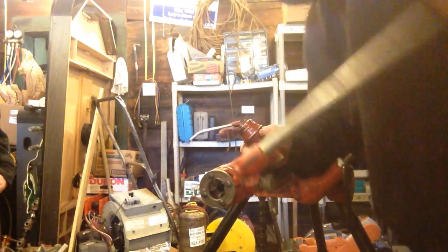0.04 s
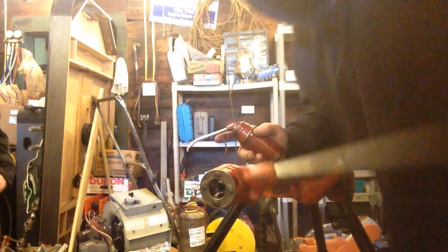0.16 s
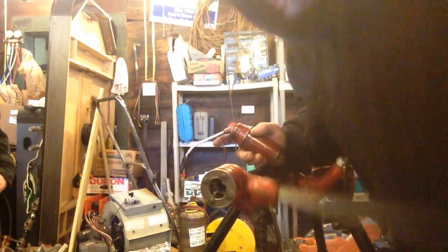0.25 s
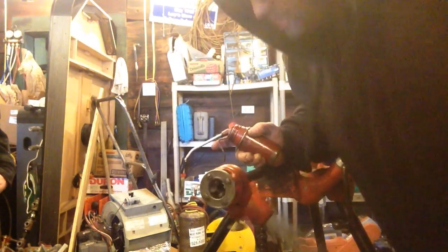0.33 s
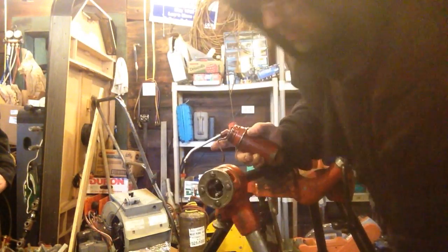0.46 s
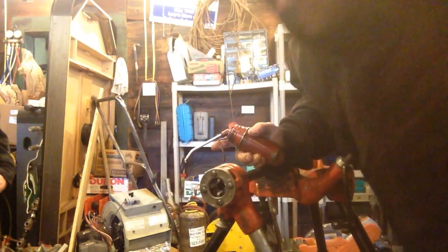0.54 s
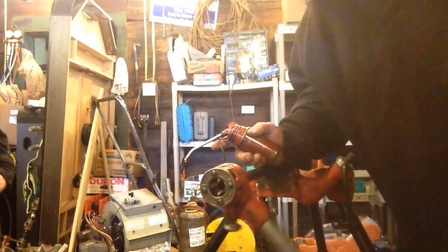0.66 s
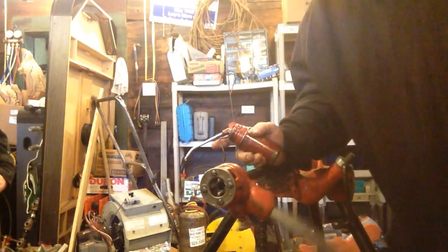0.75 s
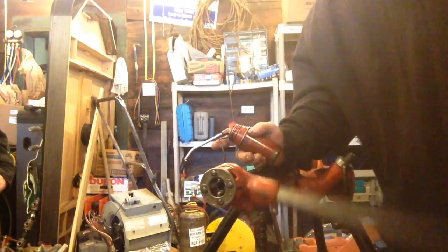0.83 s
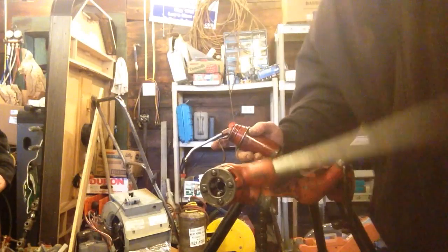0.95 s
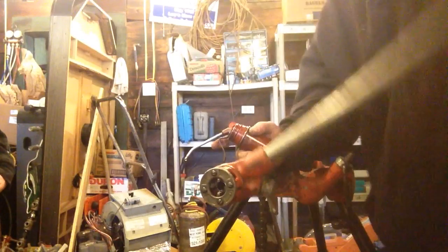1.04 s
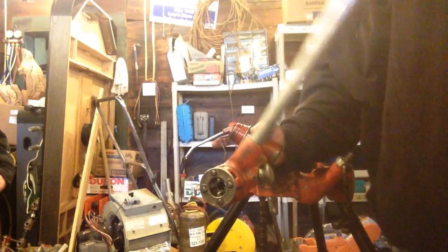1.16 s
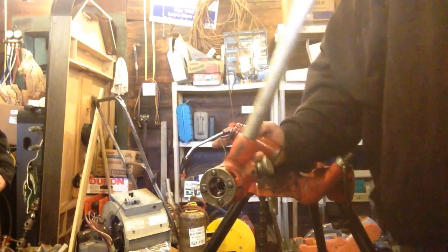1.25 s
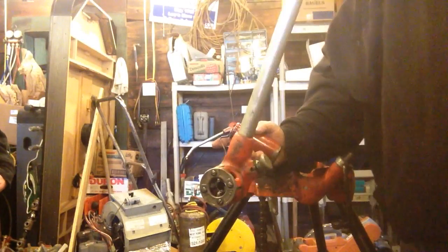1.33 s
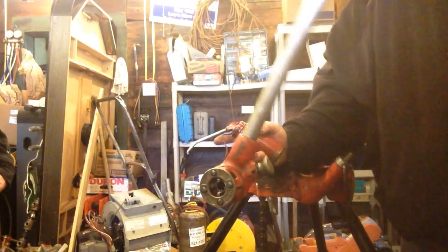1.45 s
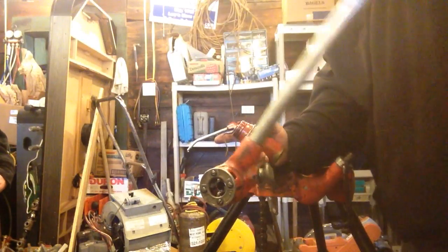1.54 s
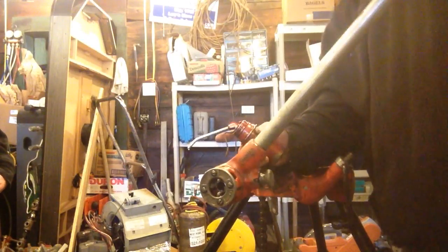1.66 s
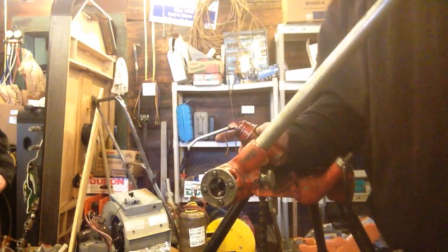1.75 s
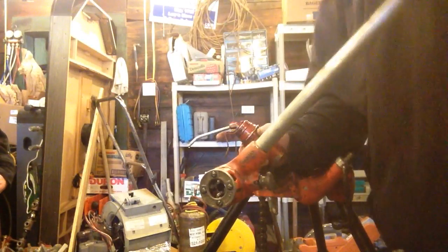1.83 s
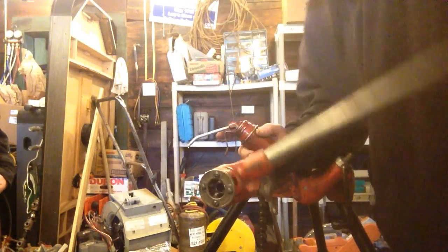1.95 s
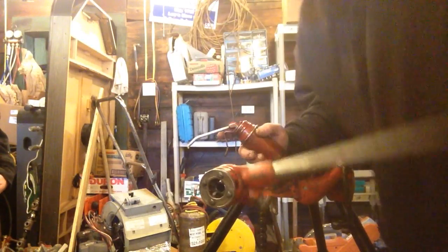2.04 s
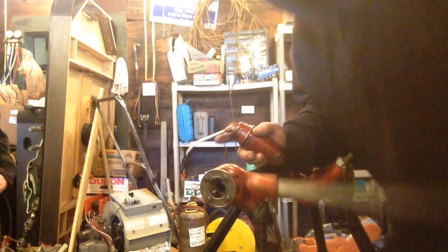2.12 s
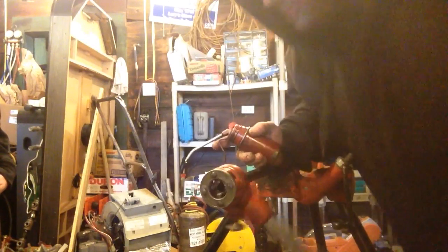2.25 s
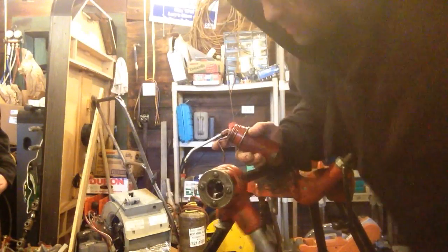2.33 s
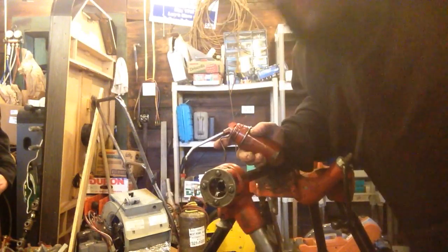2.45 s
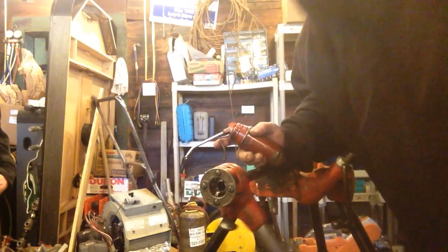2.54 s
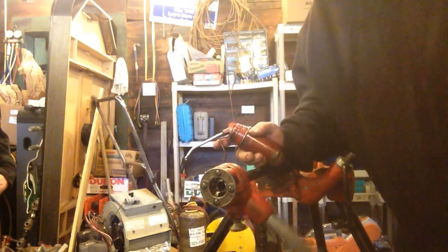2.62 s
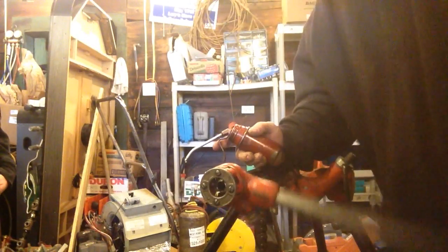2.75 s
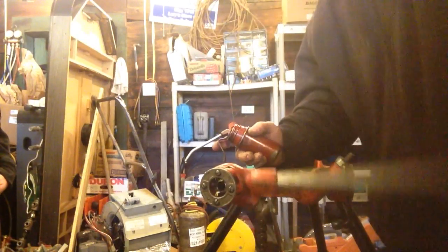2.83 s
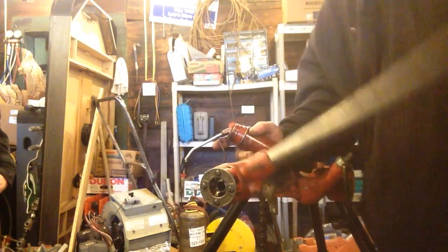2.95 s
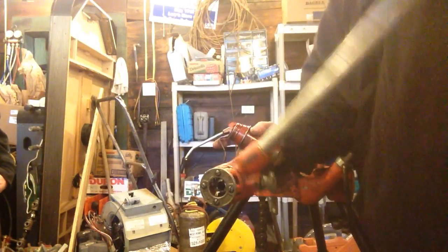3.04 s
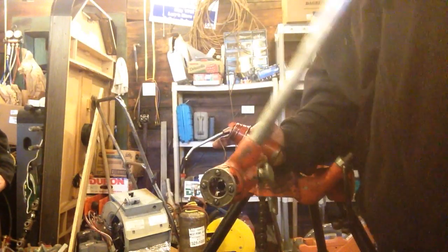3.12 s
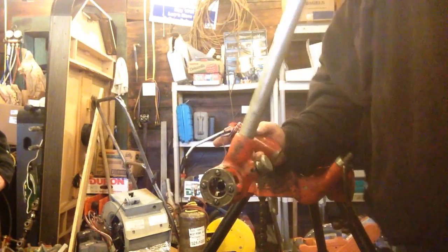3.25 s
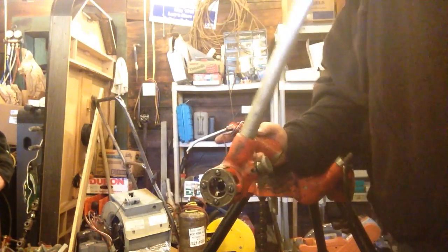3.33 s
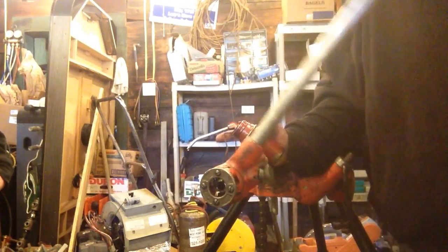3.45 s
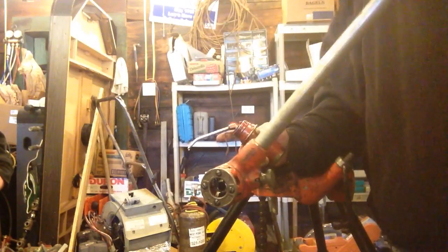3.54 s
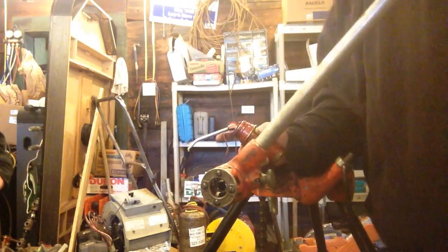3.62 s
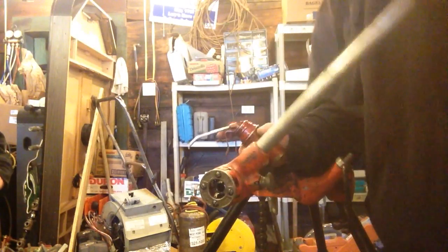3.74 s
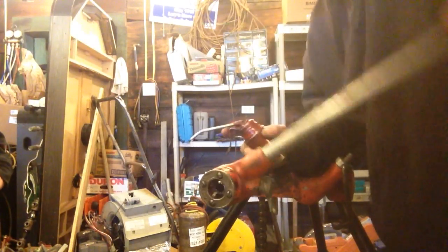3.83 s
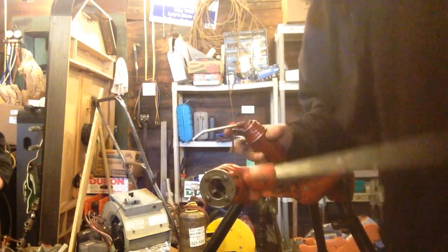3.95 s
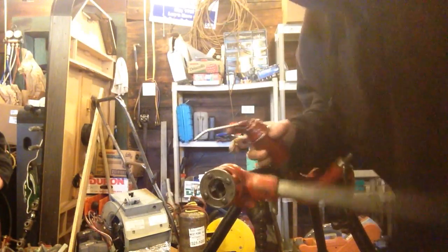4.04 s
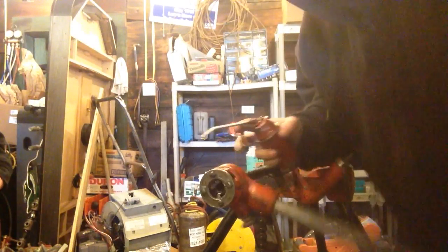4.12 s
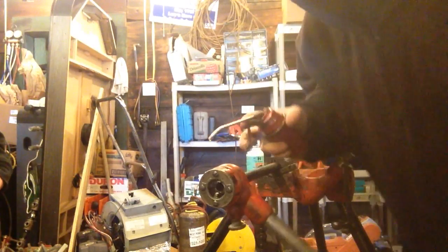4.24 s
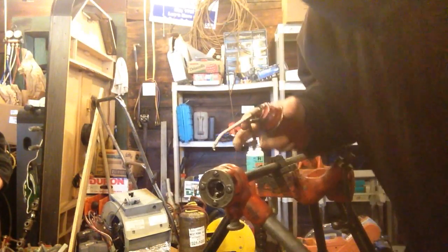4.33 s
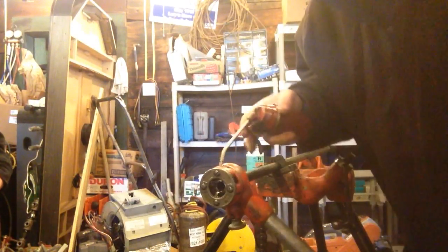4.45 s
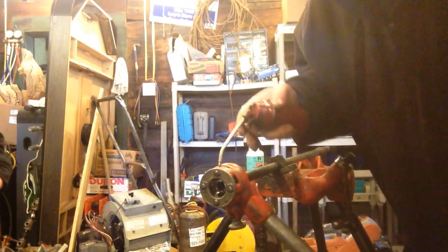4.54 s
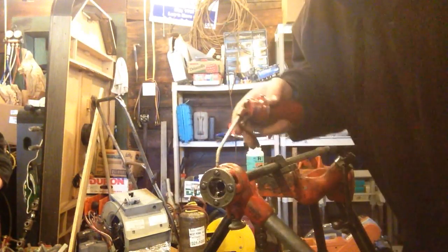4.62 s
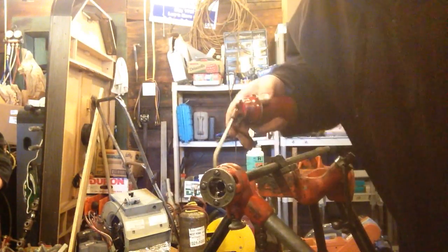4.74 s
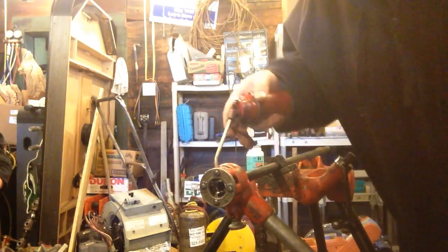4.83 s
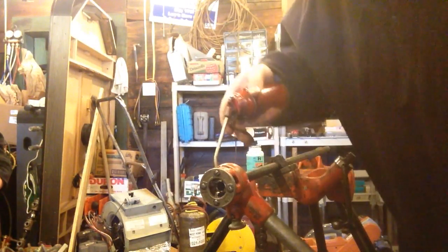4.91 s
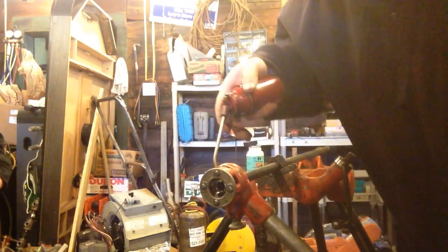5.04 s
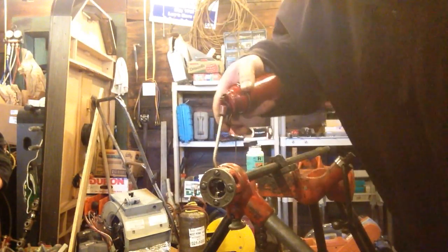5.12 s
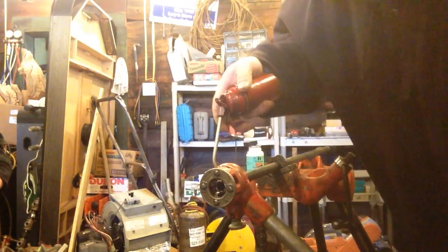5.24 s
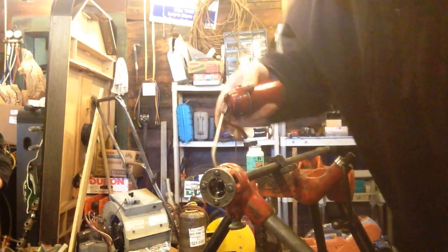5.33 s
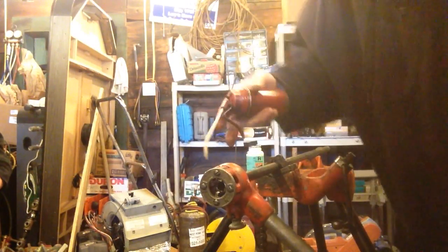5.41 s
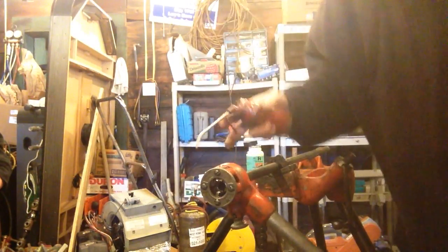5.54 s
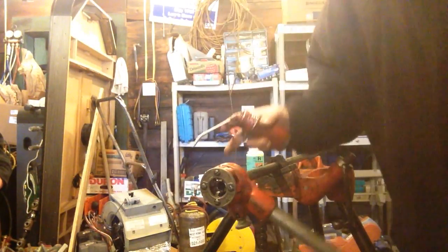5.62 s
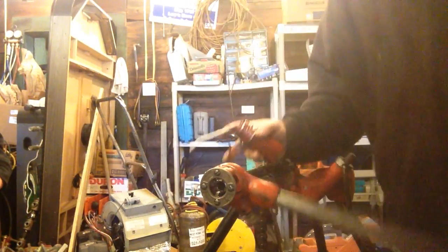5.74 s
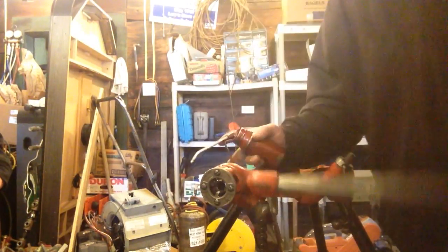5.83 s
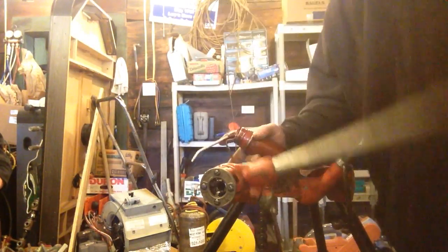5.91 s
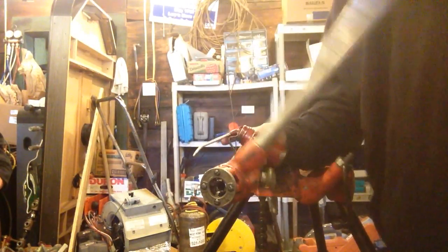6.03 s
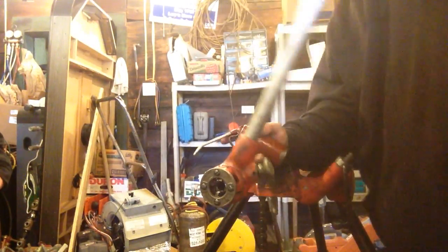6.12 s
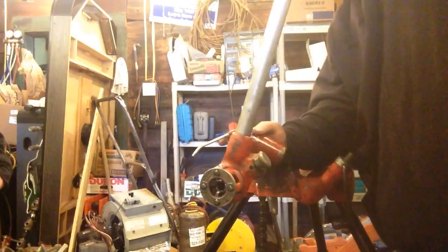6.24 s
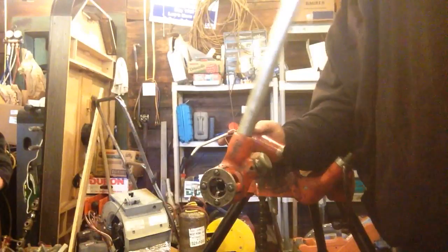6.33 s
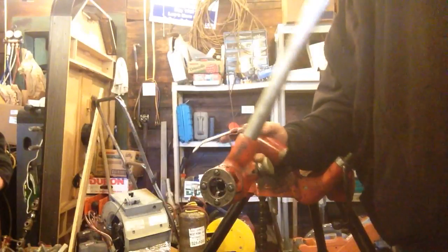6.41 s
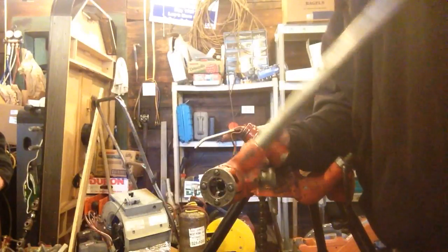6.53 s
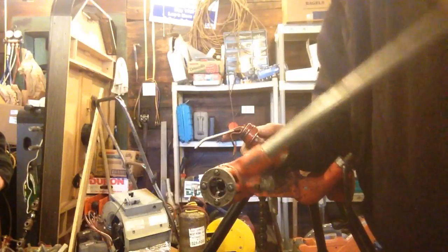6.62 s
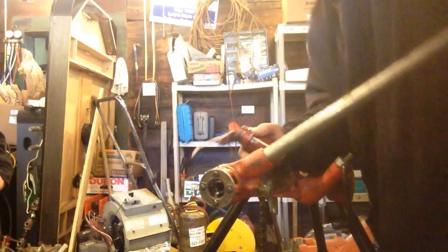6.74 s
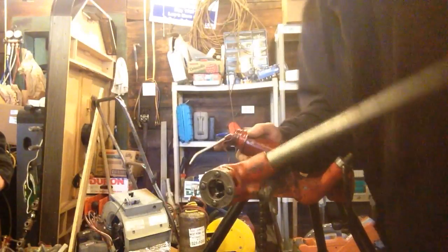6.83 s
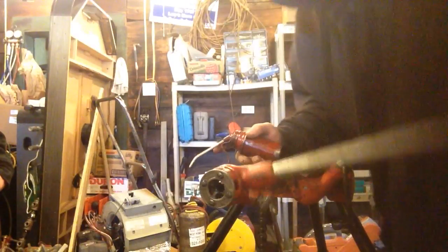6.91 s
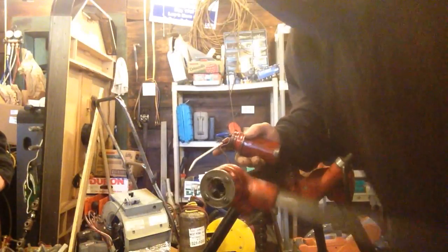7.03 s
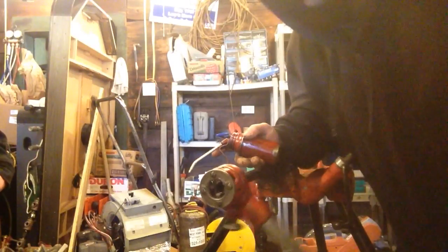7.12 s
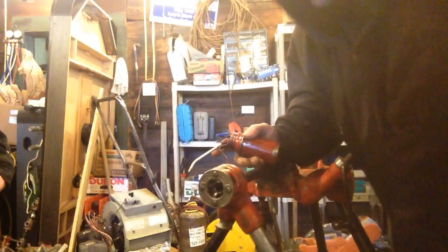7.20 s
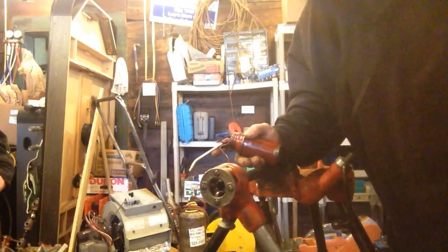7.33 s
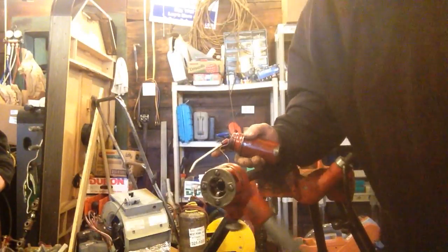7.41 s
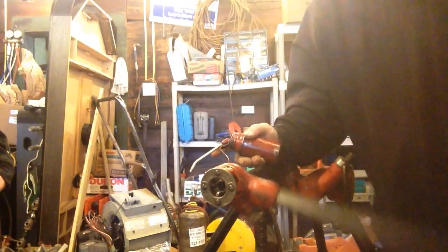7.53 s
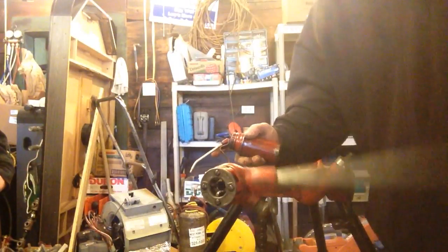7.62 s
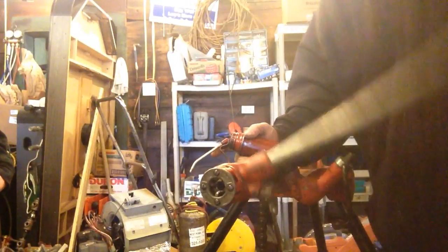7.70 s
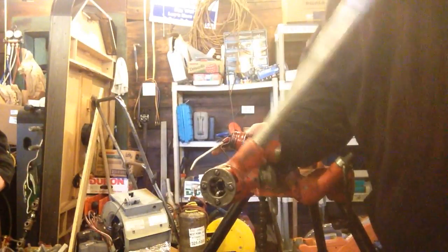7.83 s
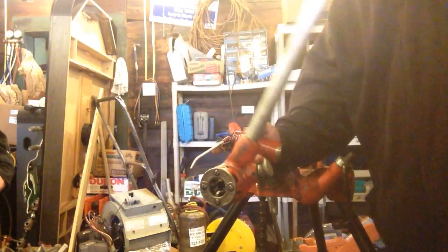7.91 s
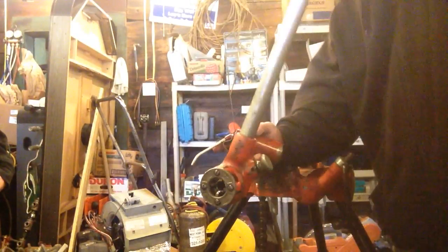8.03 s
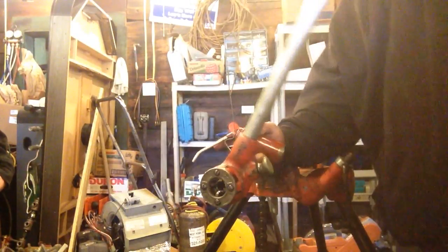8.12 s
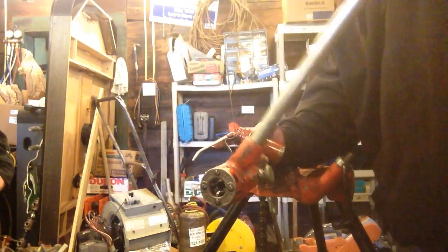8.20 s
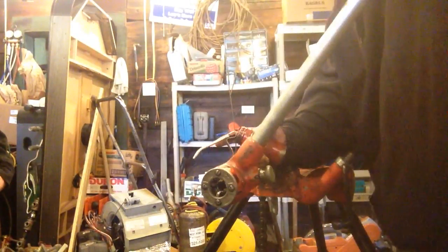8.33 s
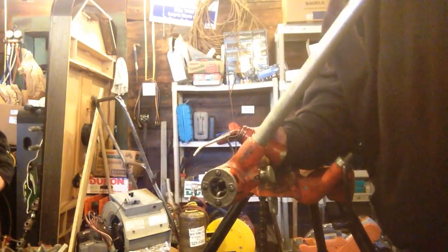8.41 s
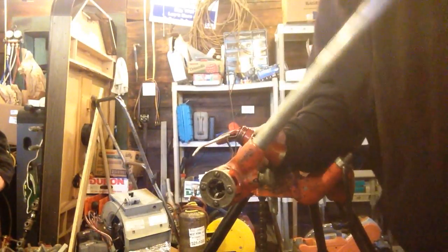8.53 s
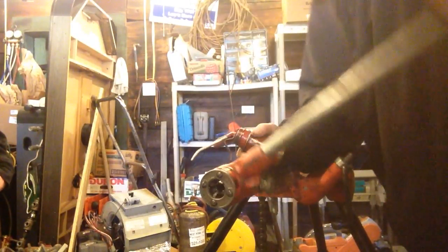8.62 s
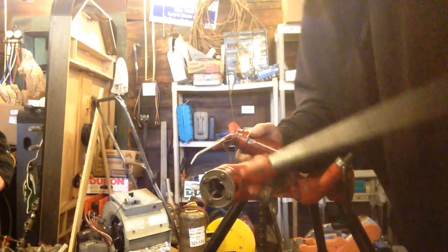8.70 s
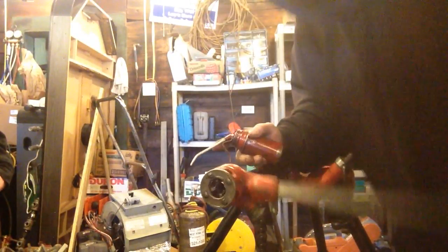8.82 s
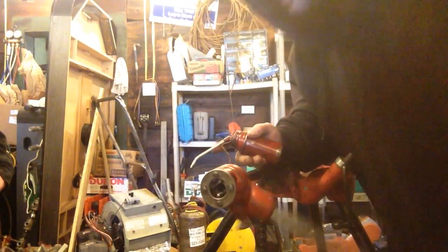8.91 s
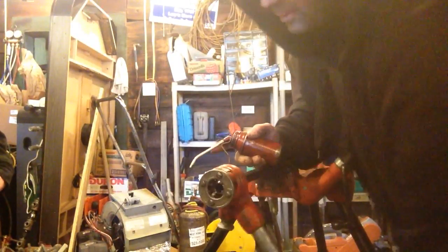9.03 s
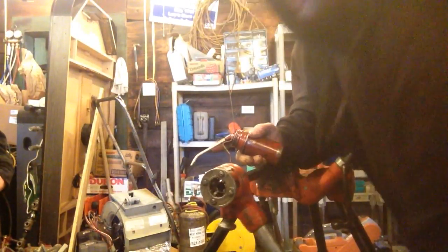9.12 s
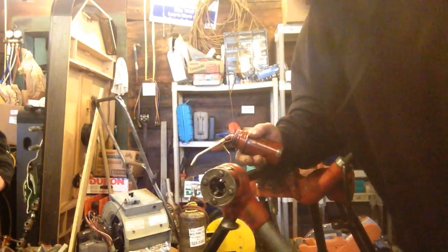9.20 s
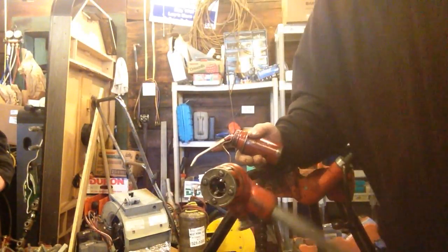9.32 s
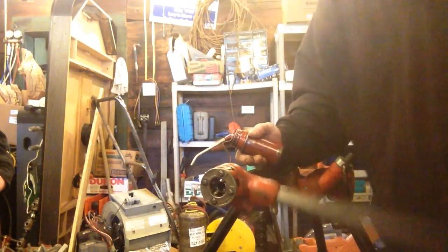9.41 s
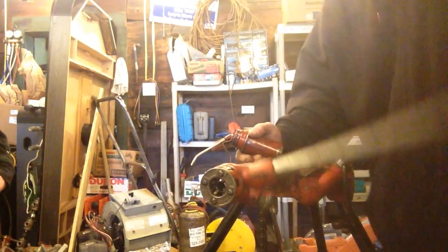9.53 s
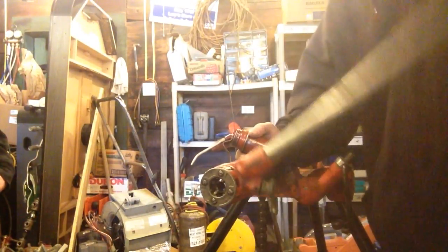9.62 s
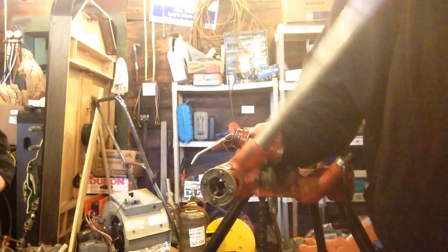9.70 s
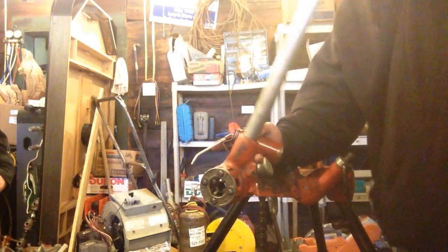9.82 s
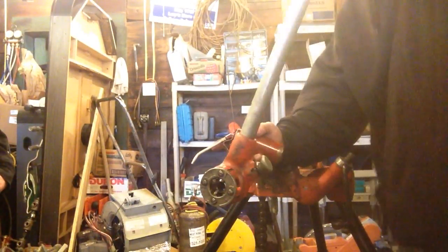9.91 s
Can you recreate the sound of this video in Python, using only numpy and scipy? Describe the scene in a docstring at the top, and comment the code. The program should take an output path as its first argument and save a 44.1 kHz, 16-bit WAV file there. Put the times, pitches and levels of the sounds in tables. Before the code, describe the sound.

In a small workshop, a hand threader cuts an iron pipe. Soft, gritty scrapes with a fine fizz swell on each down stroke, followed by louder, uneven ratchet clacks and loose handle rattles on the return. Midway the work pauses for light, tinny clicks from a pumped oil can, then scraping and ratcheting resume. The sounds are fairly close, with short reflections over faint hum and room noise.

```python
"""A small workshop: a hand threader cuts a thread on iron pipe.
Down strokes: the dies scrape, chips excite the pipe's resonances, a fine fizz rides on top.
Return strokes: the pawl clacks over the ratchet teeth; the loose handle rattles in its play.
Midway an oil can is pumped, its lever ringing the thin can. Faint hum and room noise lie under it."""
import sys
import numpy as np
from scipy import signal
from scipy.fft import rfft, irfft
from scipy.io import wavfile

SR = 44100
rng = np.random.default_rng(int(sys.argv[2]) if len(sys.argv) > 2 else 0)


def file_out(sig):
    """Save sig as 16-bit WAV at sys.argv[1]."""
    # one column per channel
    cols = np.atleast_2d(sig).T
    # limit, then scale
    lim = np.clip(cols, -1, 1)
    pcm = np.round(lim * 32767).astype(np.int16)
    wavfile.write(sys.argv[1], SR, pcm)


N = 439236

# room noise spectrum: f/Hz, relative density/dB
ROOM_SPECTRUM = [(15, -78), (25, -36), (60, -35.5), (131, -8.5), (219, -1), (357, -3), (409, -4.5),
                 (551, -10.5), (923, -11.5), (1120, -13.5), (3050, -14), (5100, -14.5), (6340, -19.5),
                 (14300, -17), (16400, -11.5)]
# hum bands: f/Hz, width/Hz, level/dB
HUM_BANDS = [(403.6, 7.8, -79), (456, 2.7, -79.5), (234, 15.8, -90)]
# down strokes: start t/s, fizz onset t/s, hardest t/s, end t/s, top scrape level/dB, fizz/dB re scrape
DOWN_STROKES = [(0, 0.077, 0.38, 0.52, -54.5, -8), (1.888, 1.93, 2.27, 2.45, -57, -7.5),
                (3.7, 3.838, 4.09, 4.386, -59.5, -5), (6.84, 6.96, 7.166, 7.3, -54, -11.5),
                (8.486, 8.62, 8.97, 9.13, -58.5, -6)]
# pipe resonances under the dies: f/Hz, width/Hz, level/dB
PIPE_MODES = [(913, 55, -1), (1430, 210, -9), (1840, 220, 1.5), (2510, 230, -1.5), (2985, 160, 2.5),
              (3680, 110, -2), (4220, 250, -10), (4990, 350, -10)]
# scrape excitation: f/Hz, relative density/dB
SCRAPE_SPECTRUM = [(300, -23), (700, -7.5), (3000, -4.5), (5500, -7), (8000, -15.5)]
# chip fizz: f/Hz, relative density/dB
FIZZ_SPECTRUM = [(3240, -32), (5500, -17), (7830, -3), (10000, -4), (14700, -2), (15700, -1), (16000, -33)]
# workshop decay: f/Hz, t60/s
SHOP_DECAY = [(250, 0.33), (660, 0.32), (1740, 0.2), (4590, 0.16), (12100, 0.13)]
# die head and handle tube modes: f/Hz, level/dB, t60/s at damping 1
IRON_MODES = [(399.7, -9, 0.18), (966, -7.5, 0.095), (1238, 0.5, 0.034), (1681, -3.5, 0.063),
              (2008, -7, 0.077), (2150, -12.5, 0.024), (2689, -8, 0.12), (3150, -2, 0.04),
              (3220, -2, 0.038), (3395, -3, 0.062), (4927, -5, 0.038), (4985, 3.5, 0.039), (6020, 6, 0.023),
              (9500, -5.5, 0.018), (14300, -14, 0.049)]
# handle and die head knocks: t/s, level/dB, ring f/Hz, tick/dB re blow; # the row at 2.5429 s is the pawl's
# rebound after its 2.4819 s clack
HANDLE_KNOCKS = [(0.0148, -58.5, 1390, -10), (0.0793, -55.5, 3520, 4), (0.6401, -50, 1010, -43),
                 (0.6812, -56, 1720, -25), (0.7694, -47.5, 3380, -16), (0.935, -49, 3250, -9),
                 (1.0016, -45.5, 3370, -11), (1.0398, -34, 3220, -21), (1.195, -60, 4900, -14),
                 (1.2125, -50, 3610, -6), (1.3216, -49.5, 3180, -14), (1.391, -59, 3253, -12),
                 (1.544, -60, 5030, -30), (1.5718, -53, 3020, -20), (1.666, -44, 2680, -26),
                 (1.7088, -47.5, 1240, -12.5), (1.8762, -52, 1280, -14), (1.935, -51.5, 4710, 3),
                 (2.4178, -39, 4500, 3), (2.5429, -45.5, 1720, -14), (2.727, -48.5, 4130, -5),
                 (2.7744, -50, 2735, -18), (2.7865, -30.5, 4650, -14), (2.9174, -54, 3340, -10),
                 (2.9811, -30.5, 5000, -29), (3.13, -58, 900.5, -21), (3.4698, -40.5, 5130, -2),
                 (3.49, -53.5, 2700, -18), (3.548, -52.5, 3700, -28), (3.5663, -44, 1220, -28),
                 (3.6184, -49.5, 1300, -9.5), (3.7702, -55.5, 1471, -19), (4.119, -52, 2500, 15),
                 (4.3332, -57.5, 3730, -11), (4.342, -64, 1310, -15), (5.5858, -43, 3217, -42),
                 (5.6518, -56, 1280, -18), (5.7685, -42, 4944, -12), (5.8035, -36, 3460, -16),
                 (6.0425, -43, 3320, -8), (6.1663, -47, 1927, -20), (6.2011, -40.5, 5030, -8),
                 (6.3039, -53, 4290, -8), (6.3133, -51.5, 3550, -22), (6.4033, -45.5, 1800, -29),
                 (6.4456, -55, 4900, -13), (6.6288, -52, 2744, -15), (6.6446, -49.5, 3340, -29),
                 (6.6946, -52.5, 3220, -22), (6.9694, -48, 1210, -15), (7.3732, -52, 1240, -14),
                 (7.4, -48, 3300, -24), (7.4285, -46.5, 3270, -40), (7.5235, -43.5, 3282, -11),
                 (7.5787, -47, 5160, -31), (7.7424, -28.5, 3660, -18), (7.908, -59, 1500, -16),
                 (7.9484, -53, 3210, -14), (7.961, -38, 3002, -7), (8.2516, -57, 1720, -28),
                 (8.2662, -46, 1230, -15), (8.3203, -46, 1240, -9), (8.5, -61, 1250, -25),
                 (8.6305, -58, 1760, 17), (9.215, -61.5, 1400, -22), (9.2332, -50.5, 1170, -27),
                 (9.2638, -49, 1960, -23), (9.437, -50, 3306, -14), (9.582, -42.5, 2960, -25),
                 (9.604, -31.5, 3070, -6), (9.8426, -36, 5435, 3), (9.9456, -51, 4960, -16)]
# pawl drops: t/s, level/dB, ring f/Hz, thud/dB, clink/dB, tick/dB (all three re blow),
# rebound delay/s (0: none)
PAWL_CLACKS = [(0.7437, -42, 3420, 5.5, 6, -20, 0), (0.8608, -21, 3230, -15, 2, -4, .0608),
               (1.032, -25.5, 3120, -7.5, 4.5, -5, .053), (1.2199, -25.5, 3740, -11, 3.5, -14.5, 0),
               (2.4339, -33, 1580, -2, -5.5, -15, 0), (2.4819, -34.5, 1220, -8, -4, -2, 0),
               (2.6241, -36, 3030, -4, 2, -25, .0314), (2.8047, -25, 4630, -6, -2, -10, .043),
               (2.9702, -29.5, 4830, -6.5, -0.5, -6, .0626), (3.173, -21.5, 2701, -14, 0.5, -14, 0),
               (5.834, -28.5, 2120, -5.5, -20, -21.5, 0), (5.9159, -21, 5150, -6, 6.5, -5, .0575),
               (6.0716, -22, 5011, -12.5, -2, -9.5, .061), (6.7107, -26.5, 3080, -7.5, -7, -24.5, 0),
               (7.4958, -39, 3400, -2, 6.5, -10, 0), (7.6047, -30, 1749, 1.5, 2.5, -4.5, .0556),
               (7.7556, -31, 1731, -8, -2, -8, .0518), (7.9652, -29, 2760, -12, -3.5, -22, 0),
               (9.3474, -41.5, 3340, -4, 2.5, -12.5, 0), (9.4744, -27, 4700, -8, -1, -8, .0607),
               (9.639, -26, 2620, -5.5, -2.5, -11, .0558), (9.8504, -21.5, 2800, -12.5, -2, -9.5, 0)]
# thin can modes: f/Hz, level/dB, t60/s at damping 1
CAN_MODES = [(580, -15, 0.037), (1036, -3, 0.038), (1520, 3.5, 0.031), (2320, -16, 0.02), (3580, -5, 0.032)]
# oil can lever knocks: t/s, level/dB, ring f/Hz, tick/dB re blow
LEVER_KNOCKS = [(4.492, -31.5, 1500, -10.5), (4.584, -42, 1570, -26), (4.596, -43, 1549, -34),
                (4.6332, -35, 1480, -14.5), (4.7077, -39, 3940, -14), (4.7272, -43, 3940, -12),
                (4.7513, -42.5, 1550, -2), (4.814, -46, 1500, -17), (4.8635, -41.5, 1430, -12),
                (4.887, -51, 1370, -6), (4.9706, -55, 4350, -1), (4.9813, -48.5, 4440, -19),
                (4.9978, -51, 4730, -3), (5.031, -57, 2100, -12), (5.046, -54, 2000, -21),
                (5.0925, -56.5, 1950, -17), (5.1268, -55.5, 2240, -14), (5.1866, -53.5, 4100, -19),
                (5.246, -53, 4050, -4), (5.2845, -35, 2270, -2.5), (5.38, -44, 4780, -3.5)]
# EQ points of a blow, f/Hz: floor, thud, blow, clink, tick
BLOW_EQ_HZ = (250, 900, 2600, 5000, 10000)
# output EQ: f/Hz, gain/dB
OUTPUT_EQ = [(500, 2), (1200, 2), (6000, -0.23), (7800, 3), (10200, -1.5), (12000, -1), (15000, -3.5)]


def gain_of(db):
    """dB to amplitude."""
    return 10 ** (np.asarray(db) / 20)


def curve(points, hz):
    """Table value at hz, log frequency axis."""
    f, value = np.transpose(points)
    return np.interp(np.log(hz + 1), np.log(f + 1), value)


def coloured(x, gain):
    """x filtered by gain(hz), scaled to rms 1."""
    y = irfft(rfft(x) * gain(np.fft.rfftfreq(len(x), 1 / SR)), len(x))
    return y / np.sqrt(np.mean(y ** 2) + 1e-20)


def peak(hz, centre_hz, width_hz):
    """Amplitude response of one resonance, 1 at centre."""
    return 1 / np.sqrt(1 + (2 * (hz - centre_hz) / width_hz) ** 2)


def room_tone():
    """Steady room noise; narrow noise bands make a wavering hum."""
    air = gain_of(-64) * coloured(rng.standard_normal(N), lambda hz: gain_of(curve(ROOM_SPECTRUM, hz)))
    hum = sum(gain_of(db) * coloured(rng.standard_normal(N), lambda hz: peak(hz, f, width) ** 2)
              for f, width, db in HUM_BANDS)
    return air + hum


def dies():
    """Dense, uneven chips excite the pipe; a finer fizz flares as chips snap off."""
    def pipe_gain(hz):
        modes = sum(gain_of(db) * peak(hz, f, width) ** 2 for f, width, db in PIPE_MODES)
        return gain_of(curve(SCRAPE_SPECTRUM, hz)) * (gain_of(-7) + modes)

    snaps_per_s, snap_decay_s = 25, 0.0044
    t = np.arange(N) / SR
    sizes = np.minimum(rng.exponential(1, (2, N // 64 + 1)), 3).repeat(64, axis=1)[:, :N]
    chips = rng.standard_normal((2, N)) * gain_of(2.2 * sizes)
    scrape = coloured(chips[0], pipe_gain)
    breaks = (rng.random(N) < snaps_per_s / SR) * np.minimum(rng.exponential(1, N), 2)
    snaps = signal.lfilter([1], [1, -np.exp(-1 / (snap_decay_s * SR))], breaks)
    fizz = coloured(chips[1] * (1 + gain_of(7) * snaps), lambda hz: gain_of(curve(FIZZ_SPECTRUM, hz)))
    out = np.zeros(N)
    for start_s, fizz_s, hardest_s, end_s, scrape_db, fizz_db in DOWN_STROKES:
        before = np.clip((hardest_s - t) / (hardest_s - start_s), 0, 2)
        after = np.clip((t - hardest_s) / (end_s - hardest_s), 0, 2)
        swell_db = -14.5 * before ** 1.52
        level = gain_of(scrape_db - 22.5 * after ** 2.4) * (np.maximum(before, after) < 2)
        cutting = np.clip((t - fizz_s) / .02, 0, 1)
        fizz_gain = cutting * gain_of(0.61 * swell_db + fizz_db + 7 * after)  # swells and fades less
        out += level * (gain_of(swell_db) * scrape + fizz_gain * fizz)
    return out


def shop_reflections(x):
    """Dense reflections dying band by band; three tails rotate, so blows echo differently."""
    gap_s, build_s, rotation_hz = .003, 0.0045, 7.3
    onset = np.clip((np.arange(SR // 2) / SR - gap_s) / build_s, 0, 1)
    hz, t, spectra = signal.stft(rng.standard_normal((3, SR // 2)) * onset, SR, nperseg=128)
    decay = gain_of(-60 * t / curve(SHOP_DECAY, hz)[:, None])
    tails = signal.istft(spectra * decay, SR, nperseg=128)[1]
    turns = rotation_hz * np.arange(N) / SR + np.arange(3)[:, None] / 3
    shares = np.sqrt(2 / 3) * np.cos(2 * np.pi * turns)
    return signal.fftconvolve(x * shares, tails / np.linalg.norm(tails[0]), axes=1).sum(0)[:N]


def blows(events, modes, crack_db, crack_s, snap_db, favour_db, hump_db, rise_s, base_damping):
    """Metal impacts: snap, crack and ringing modes, each struck at a new spot and EQ'd as a whole."""
    body_hz, body_rise_s = 1210, 0.003  # heavy, low parts start late
    out, t = np.zeros(N + 8192), np.arange(8192) / SR
    mode_hz, mode_db, t60_s = np.transpose(modes)[:, :, None]
    bin_hz = np.fft.rfftfreq(len(t), 1 / SR)
    heavy = peak(bin_hz, 0, 2 * body_hz) ** 4
    for start_s, level_db, ring_hz, thud_db, clink_db, tick_db in events:
        # high, hard or hand-muted blows die sooner
        damping = base_damping + 0.36 * np.log2(ring_hz / 1000) + 0.02 * level_db - 0.0044 * tick_db
        fall_db = 60 * np.clip(damping, .5, 4) * t / t60_s
        favoured_db = favour_db * np.exp(-(np.log(mode_hz / ring_hz) / 0.074) ** 2)
        muffled_db = 0.17 * max(thud_db + 10.5, 0)  # dull blows hit heavy metal, ring less
        spot, detune, phase = rng.standard_normal((len(modes), 3)).T[:, :, None]
        beats = 1 + .8 * np.cos(2 * np.pi * (.012 * mode_hz * spot * t + phase))  # close mode clusters
        seated_hz = mode_hz * (1 + .008 * detune)  # loose parts reseat at each blow
        envelopes = gain_of(mode_db + favoured_db + 2 * spot - muffled_db - fall_db) * beats
        ring = (envelopes * np.sin(2 * np.pi * (seated_hz * t + phase))).sum(0)
        noise = rng.standard_normal((2, len(t) + 1))
        crack = gain_of(crack_db - 60 * np.clip(damping, .5, 4) * t / crack_s) * noise[0, 1:]
        snap = gain_of(snap_db - 60 * t / 0.0064) * np.diff(noise[1])  # bright first contact
        band_db = (.5 * thud_db - 13.5, thud_db, 0, clink_db, tick_db)
        eq_db = curve(list(zip(BLOW_EQ_HZ, band_db)), bin_hz)
        eq_db += hump_db * np.exp(-(np.log((bin_hz + 1) / ring_hz) / 0.11) ** 2)  # struck part's clunk
        body, edge = irfft(rfft(ring + crack + snap) * gain_of(eq_db) * [heavy, 1 - heavy])
        blow = edge + body * (1 - np.exp(-t / body_rise_s))
        contact_s = rise_s * gain_of(0.26 * (thud_db + 14))  # dull blows start slower
        blow *= (1 - np.exp(-t / contact_s)) * (t < .17)
        attack_rms = np.sqrt(np.mean(blow[:220] ** 2))
        out[round(start_s * SR):][:len(t)] += gain_of(level_db) * blow / attack_rms
    return out[:N]


def iron_blows(events):
    """Impacts ringing the die head and handle tube."""
    return blows(events, IRON_MODES, crack_db=17, crack_s=0.037, snap_db=15.5,
                 favour_db=4, hump_db=4.5, rise_s=0.00071, base_damping=1.48)


def light_knocks(knocks, thud_db, thud_db_per_oct, clink_db, clink_db_per_oct, tick_share):
    """Knocks as blow events: thud and clink follow pitch re 1 kHz; clink also follows tick."""
    for start_s, level_db, ring_hz, tick_db in knocks:
        octaves = np.log2(ring_hz / 1000)
        thud = thud_db + thud_db_per_oct * octaves
        clink = clink_db + clink_db_per_oct * octaves + tick_share * tick_db
        yield start_s, level_db, ring_hz, thud, clink, tick_db


def handle_rattle():
    """Loose handle and die head knock in their play, plus one pawl rebound; higher parts thud less."""
    return iron_blows(light_knocks(HANDLE_KNOCKS, thud_db=7.3, thud_db_per_oct=-6.5,
                                   clink_db=-4, clink_db_per_oct=3.4, tick_share=0.26))


def pawl():
    """The sprung pawl drops over each tooth, sometimes with a lighter rebound."""
    ring_hz, thud_db, clink_db, tick_db = 4930, -10.5, -4.5, -12  # of a rebound
    clacks = [row[:6] for row in PAWL_CLACKS]
    rebounds = [(start_s + delay_s, -32 + 0.25 * level_db, ring_hz, thud_db, clink_db, tick_db)
                for start_s, level_db, *_, delay_s in PAWL_CLACKS if delay_s > 0]
    return iron_blows(clacks + rebounds)


def oil_can():
    """The pump lever knocks and rings the thin can."""
    knocks = light_knocks(LEVER_KNOCKS, thud_db=-6.5, thud_db_per_oct=1,
                          clink_db=2.3, clink_db_per_oct=0.26, tick_share=0.38)
    return blows(knocks, CAN_MODES, crack_db=14, crack_s=0.025, snap_db=19.5,
                 favour_db=-1, hump_db=4, rise_s=0.00022, base_damping=1.74)


def scene():
    """Impacts and cutting, direct and reflected, over room tone."""
    low_cut = signal.butter(2, 260, "high", fs=SR, output="sos")  # small parts, no bass
    direct = signal.sosfilt(low_cut, pawl() + handle_rattle() + oil_can()) + dies()
    return (direct + gain_of(-2) * shop_reflections(direct) + room_tone())[None]


def record(dry):
    """Mild EQ, then a 15.25 kHz low-pass."""
    eq_db = curve(OUTPUT_EQ, np.fft.rfftfreq(N, 1 / SR))
    equalised = irfft(rfft(dry) * gain_of(eq_db), N)
    low_pass = signal.firwin(161, 15250, window=("kaiser", 7), fs=SR)
    return signal.oaconvolve(equalised, low_pass[None], "same")


dry = scene()
out = record(dry)
file_out(out)
```